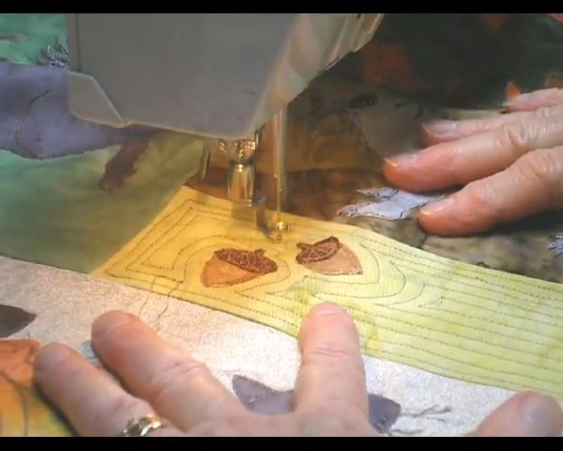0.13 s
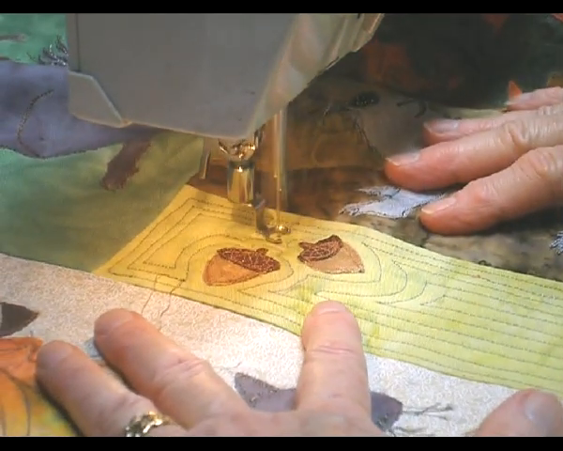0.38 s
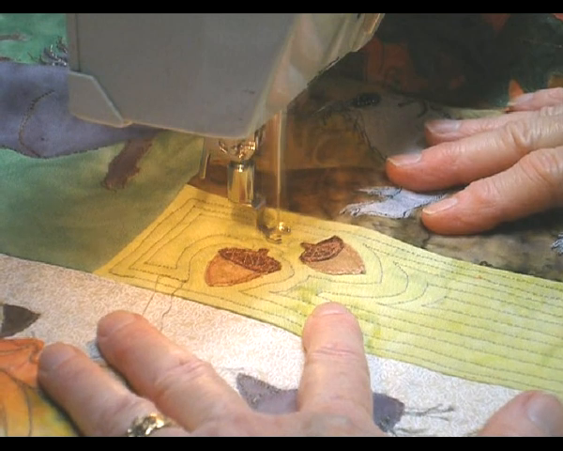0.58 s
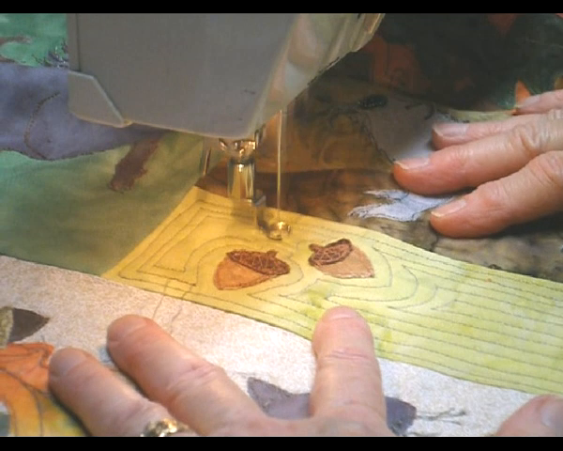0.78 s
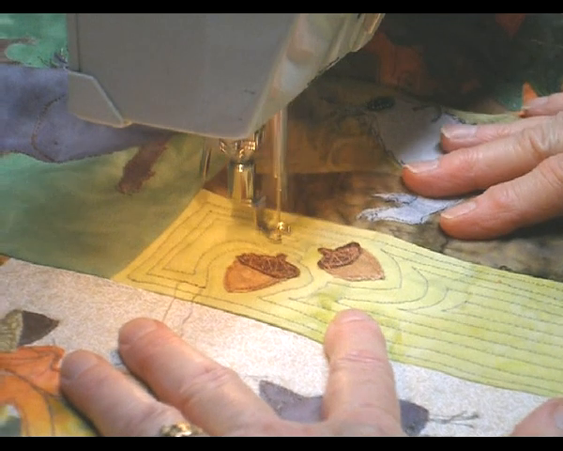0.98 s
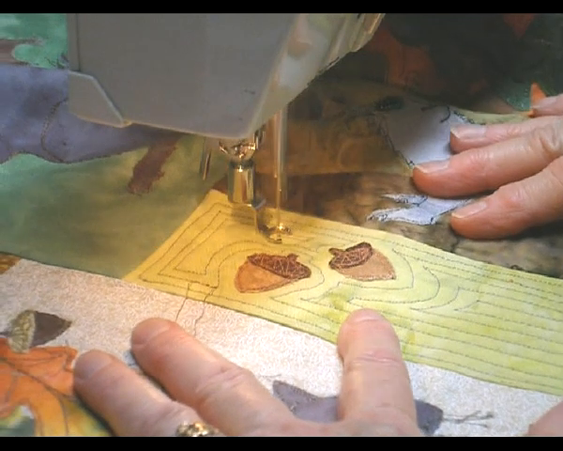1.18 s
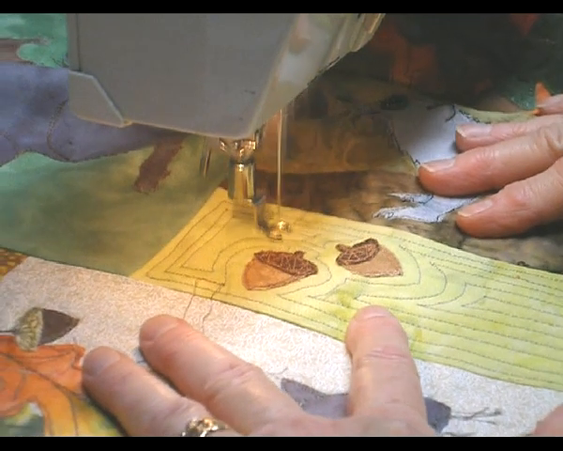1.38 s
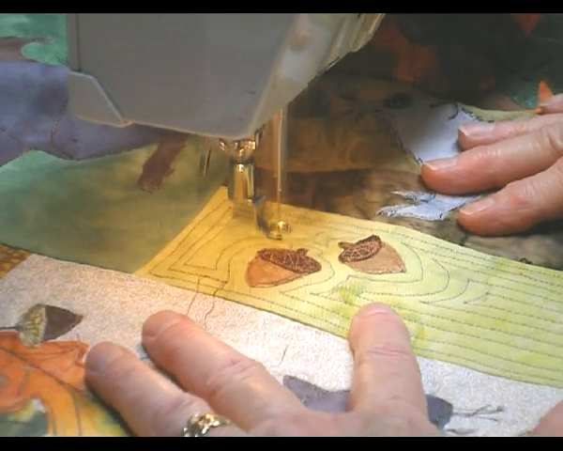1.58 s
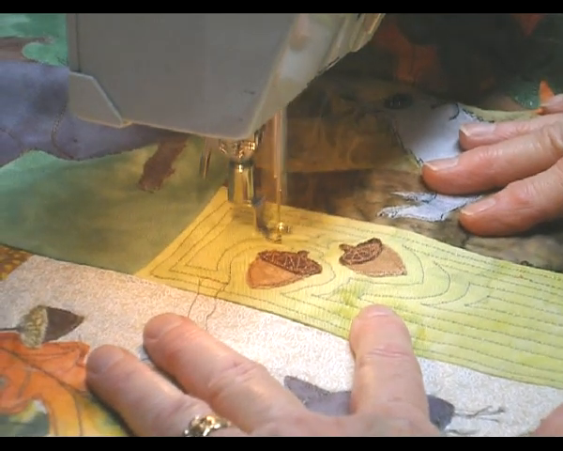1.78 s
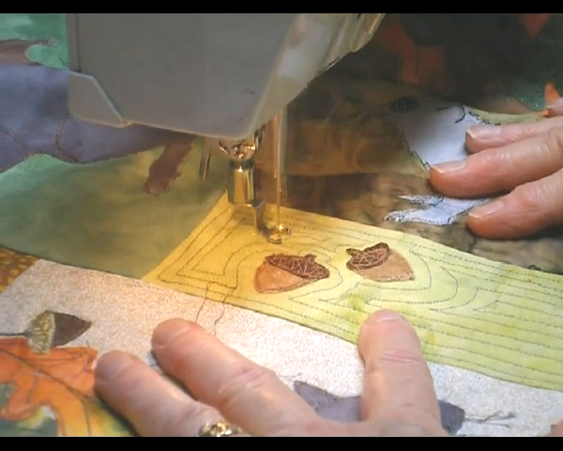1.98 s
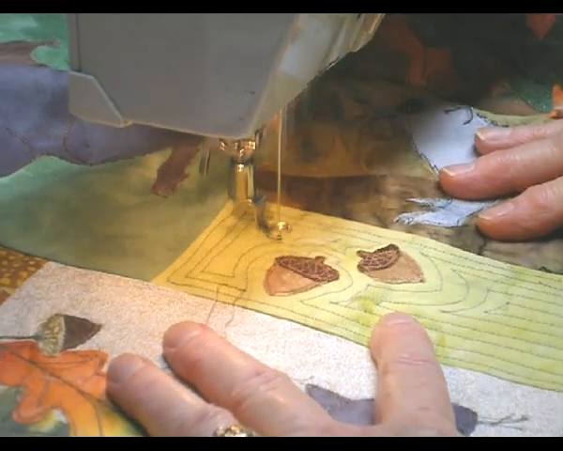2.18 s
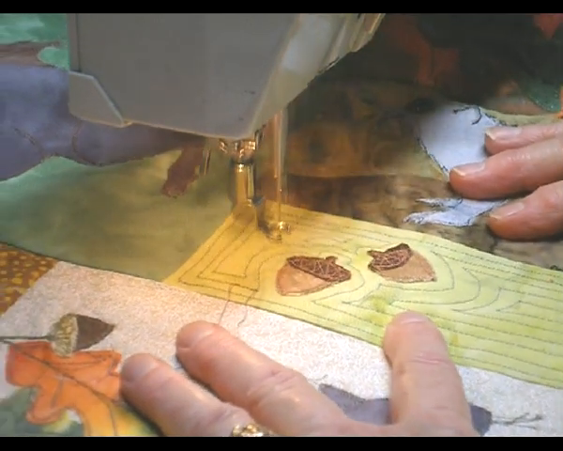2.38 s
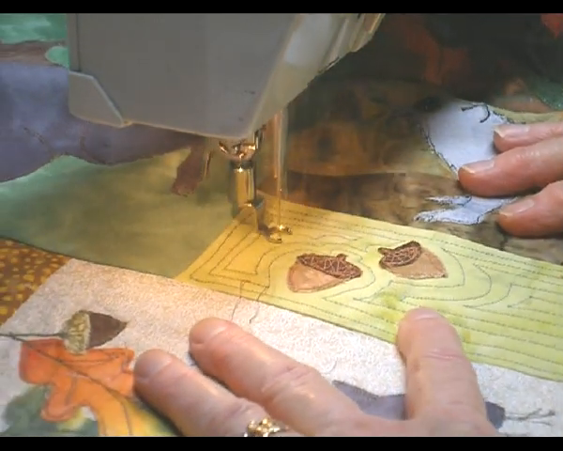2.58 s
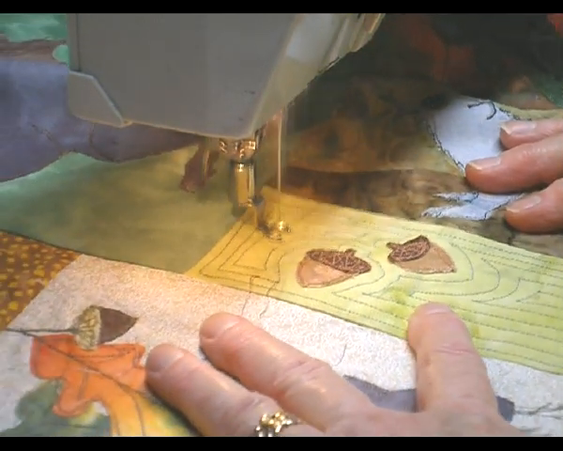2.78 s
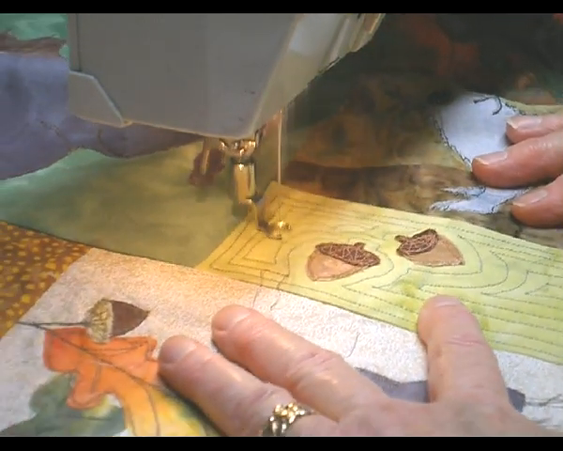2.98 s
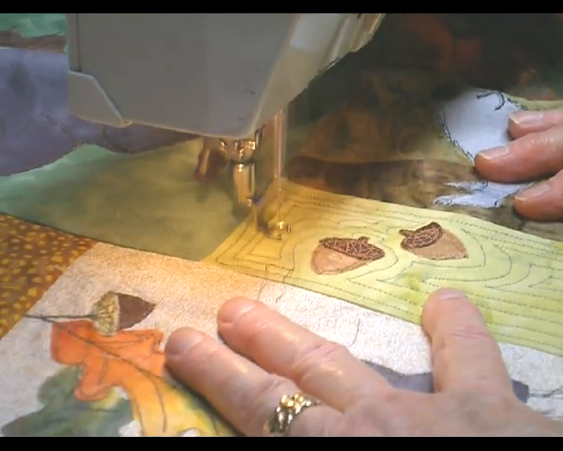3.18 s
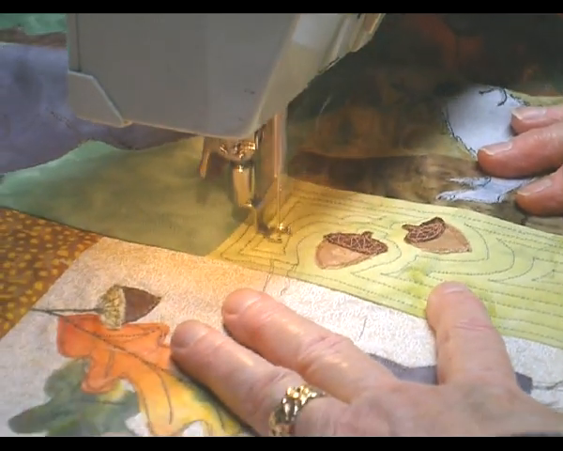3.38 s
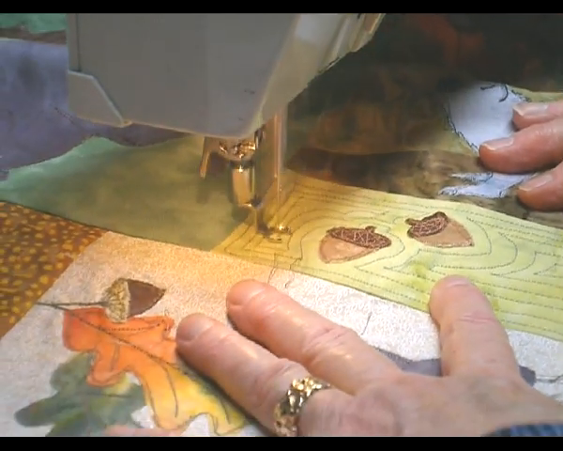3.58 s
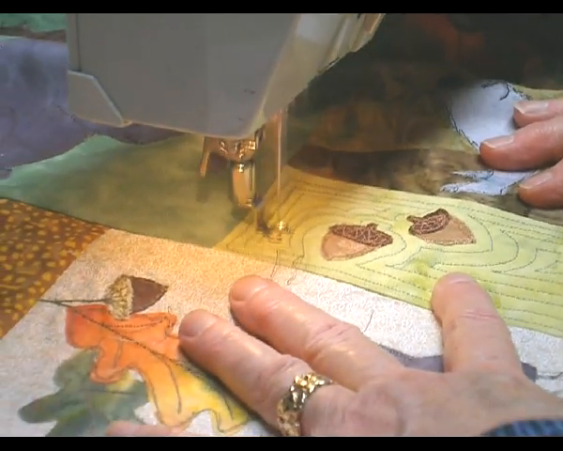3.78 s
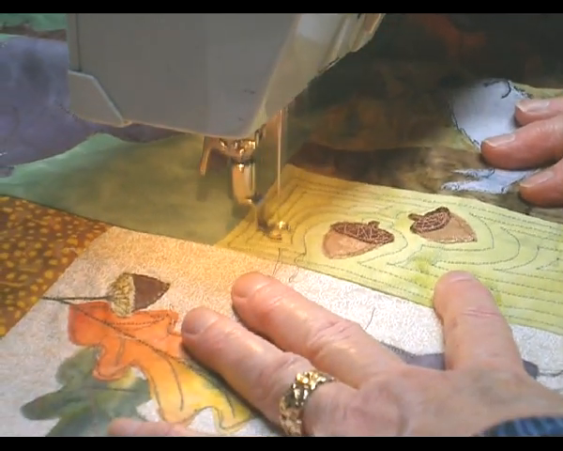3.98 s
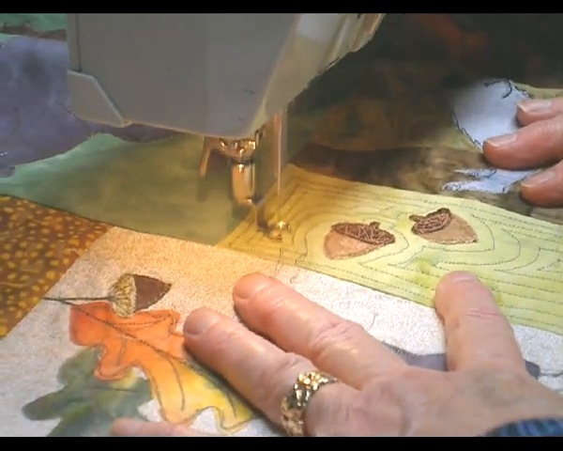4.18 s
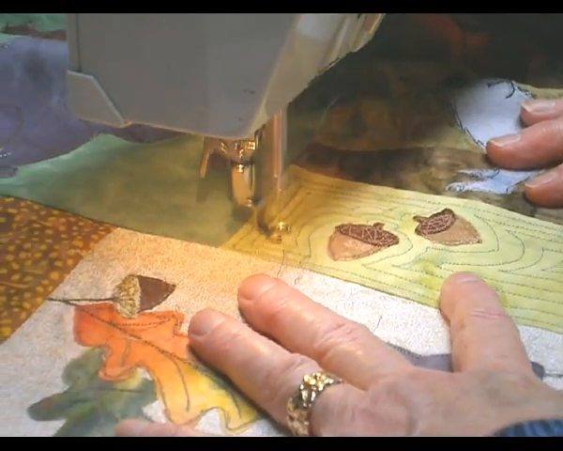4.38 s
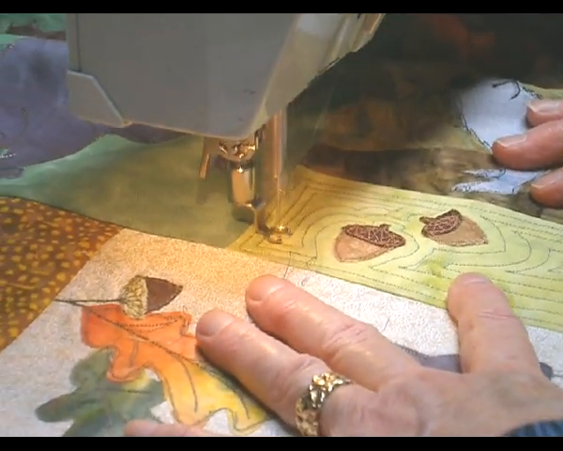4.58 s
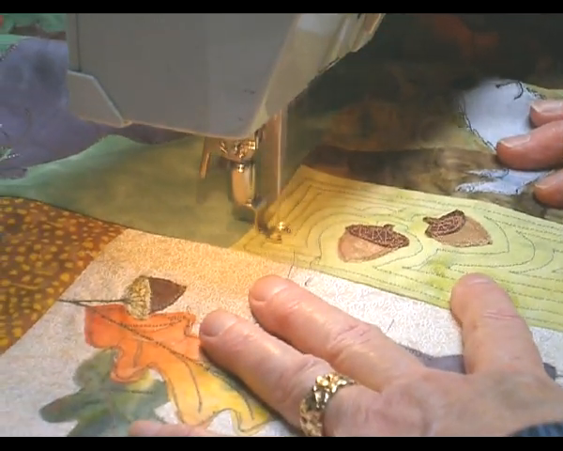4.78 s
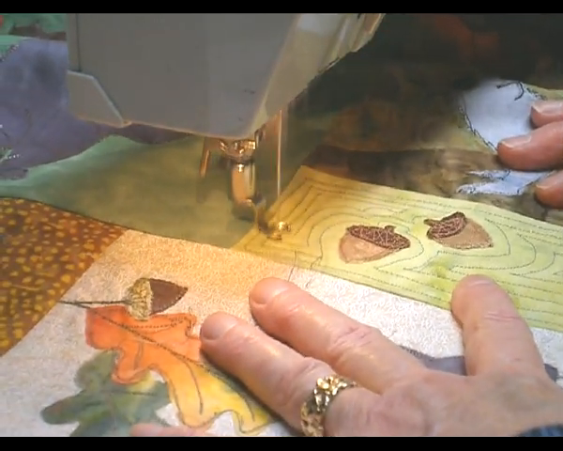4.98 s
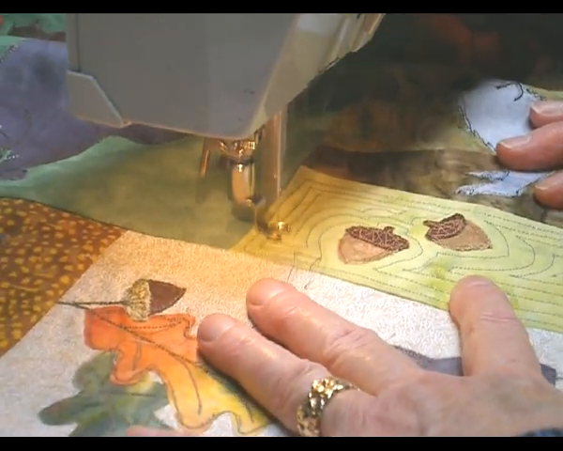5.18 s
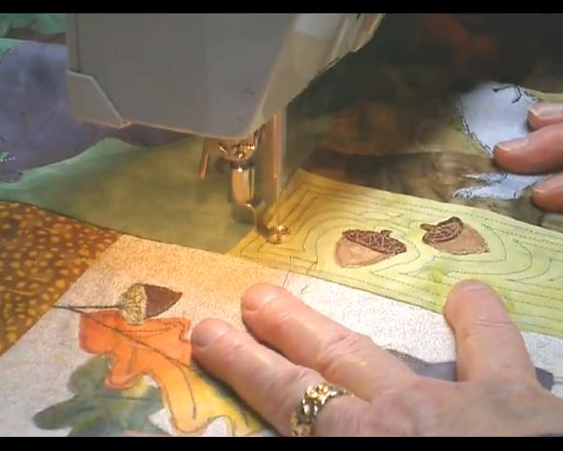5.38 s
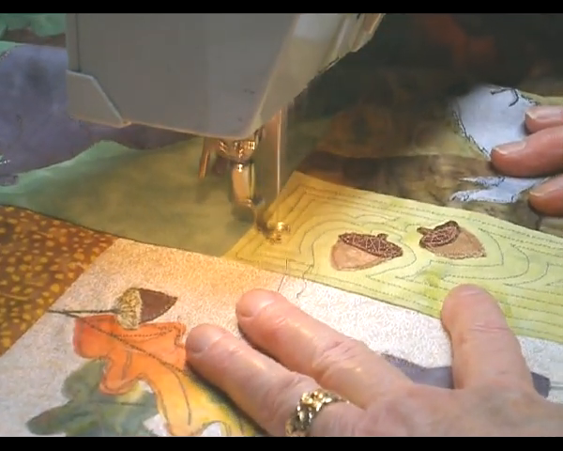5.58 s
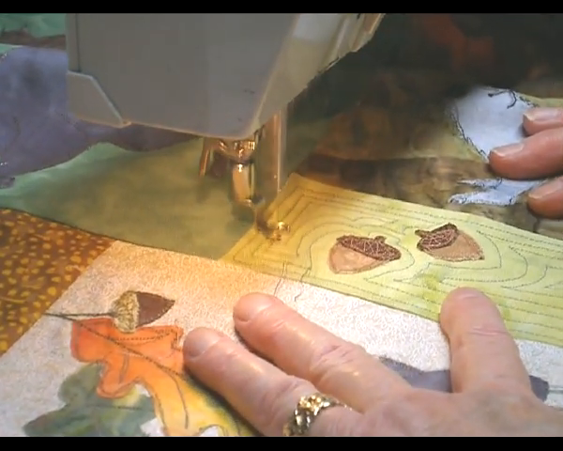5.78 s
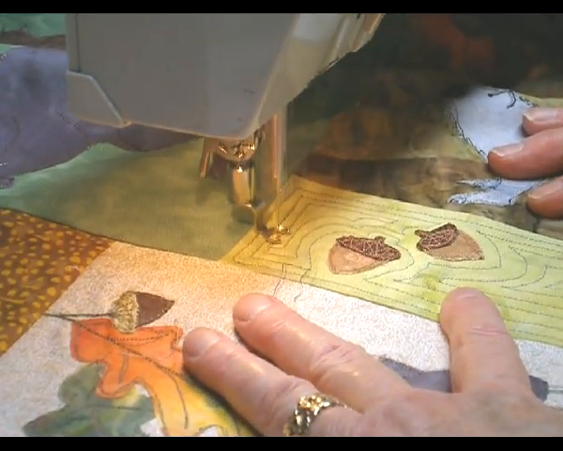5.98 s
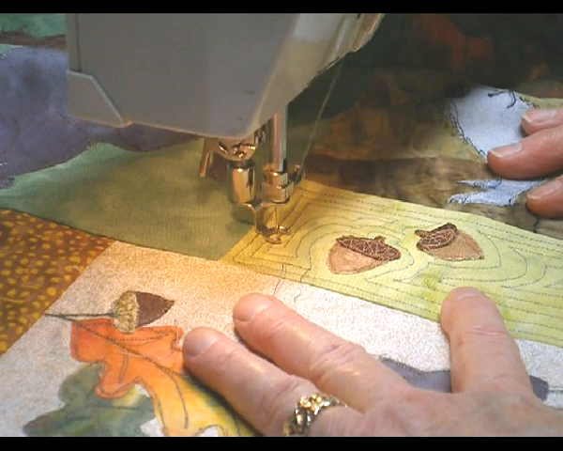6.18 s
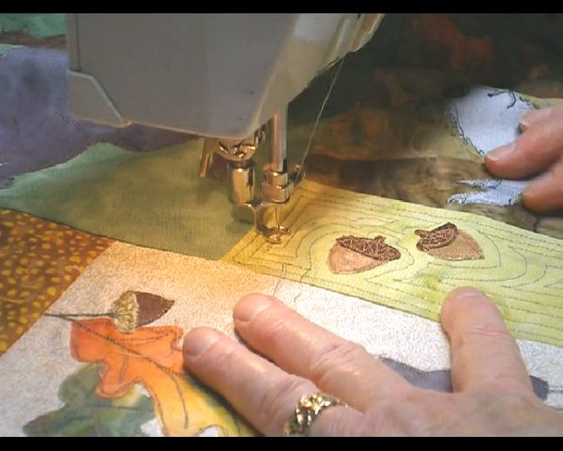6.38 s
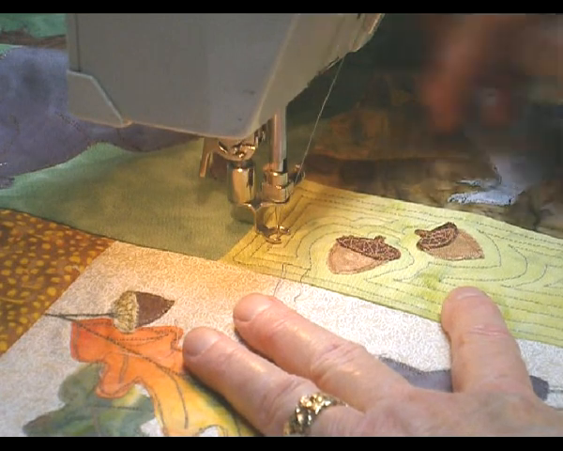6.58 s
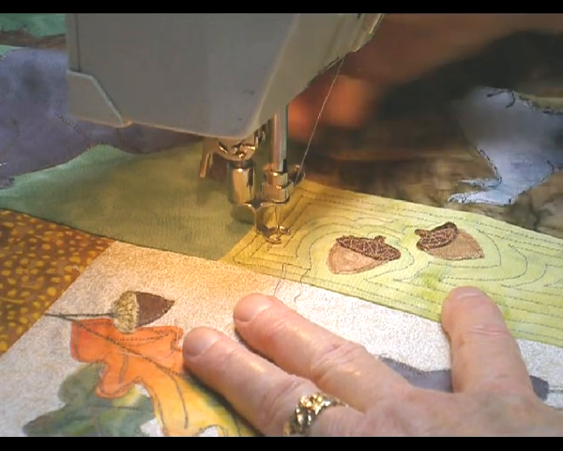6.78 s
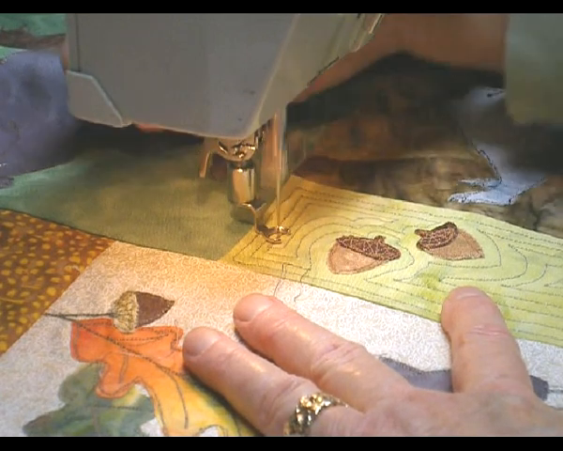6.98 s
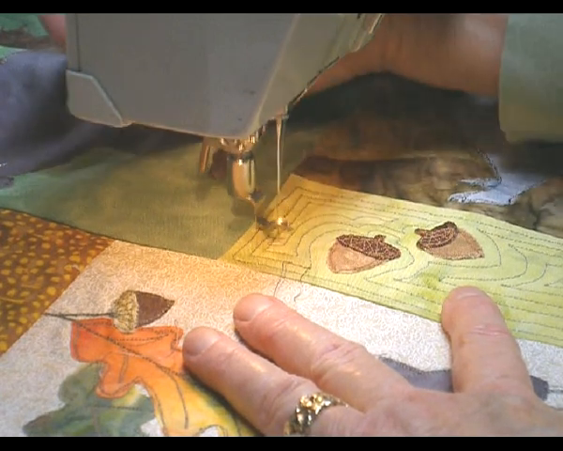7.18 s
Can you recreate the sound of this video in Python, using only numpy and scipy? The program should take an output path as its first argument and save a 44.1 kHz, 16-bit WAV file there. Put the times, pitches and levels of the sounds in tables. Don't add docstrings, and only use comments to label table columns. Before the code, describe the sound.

A home sewing machine chatters rapidly and steadily through layered cloth, stops abruptly, then a hush with a brief groan and click from the handwheel.

```python
import sys
import numpy as np
from scipy import signal
from scipy.fft import rfft, irfft, next_fast_len
from scipy.io import wavfile
from scipy.ndimage import uniform_filter1d, map_coordinates

SR = 44100
rng = np.random.default_rng(int(sys.argv[2]) if len(sys.argv) > 2 else 0)


def store_pcm(level_fs):
    pcm = np.round(np.clip(level_fs, -1, 1) * 32767).astype(np.int16)
    wavfile.write(sys.argv[1], SR, np.atleast_2d(pcm).T)


def nominal_scale(level):
    x = np.asarray(level, float) / 20
    return 10 ** x


N = 319725

# start_s, speed_turns_per_s
SHAFT_SPEED = [(0.0, 16.066), (.22, 15.822), (.312, 16.26), (.541, 16.05), (.887, 16.145), (1.008, 16.634),
               (1.643, 16.044), (2.206, 16.644), (2.589, 16.608), (2.823, 16.122), (3.225, 16.026),
               (3.752, 15.801), (3.954, 15.995), (4.216, 15.807), (4.65, 16.03), (4.799, 16.121),
               (5.005, 16.037), (5.372, 16.636), (6.335, 12)]
# time_s, level_db
DRIVE_LEVEL = [(0.0, -20), (0.4, -21.5), (2.0, -21), (2.8, -22.5), (3.6, -20.5), (4.0, -21.5), (4.4, -21),
               (5.2, -21), (5.6, -22), (6.0, -21), (6.2, -22), (6.25, -20.5), (6.292, -23), (6.32, -19.5),
               (6.345, -23.5), (6.414, -37), (6.476, -52), (6.5, -38)]
# phase_turns, level_db
SLIDE_SWELL = [(-.5, -2), (-.43, -4), (-.33, 0), (-.18, 1.5), (-.07, -0.5), (-.02, -3.5), (0.041, -3.5),
               (0.13, -6), (0.23, -1), (0.33, -1.5), (0.421, 0), (0.498, -6)]
# frequency_hz, density_db_per_hz
WHIRR_SPECTRUM = [(60, -50), (152, -31), (280, 0), (468, 0), (517, -25), (581, -4.5), (879, -7),
                  (1130, -4.5), (2190, -8), (3000, -5), (4000, -14)]
# phase_turns, level_db, centre_hz, spread_octaves
TURN_KNOCKS = [(-.46, -15, 300, .6), (-.37, 4, 600, .5), (-.3, -7, 1200, .6), (-.19, 4.5, 616, 0.22),
               (-.15, 9, 1300, 0.28), (-.11, -20, 305, 0.44), (-.03, -2, 294, 0.23), (-.01, -2, 1170, 0.42),
               (0.019, -5, 580, 0.38), (0.051, 3.5, 1400, 0.52), (0.08, -7, 597, 0.48),
               (0.222, -29, 880, 0.52), (0.291, -6, 318, 0.48), (0.377, -9, 315, 0.82),
               (0.443, -5, 617, 0.41)]
# frequency_hz, level_db, t60_s
BODY_MODES = [(251.5, -6, 0.22), (288, -11, 0.17), (363, -15, 0.054), (408.6, -5.5, 0.26), (465, -3, 0.14),
              (548.5, -11.5, 0.11), (575.1, -6, 0.34), (601, -4, 0.074), (648, -7, 0.23),
              (702.6, 3.5, 0.057), (800, -2.5, 0.088), (961, -0.5, 0.048), (1005, -12.5, 0.081),
              (1115, -11, 0.17), (1097, -10.5, 0.054), (1229, -15, 0.37), (1481, -13, 0.058),
              (1744, 0, 0.041), (1898, -4, 0.061), (2370, -2, 0.013), (2590, 2, 0.052), (2910, -4, 0.004),
              (3090, -0.5, 0.081)]
# order_per_turn, level_db
SHAFT_HARMONICS = [(7, -34), (11, -40), (16, -34), (18, -28), (26, -27), (30, -29), (36, -19), (60, -27),
                   (69, -24)]
# phase_turns, level_db, frequency_hz, t60_s
CLOTH_THUMPS = [(-.459, -7, 842, .01), (-.45, -9, 300, .02), (-.392, -6.5, 575, .05),
                (-.369, -8.4, 695, .025), (-.359, -8.5, 1099, .06), (-.31, -8.5, 2600, .012),
                (-.29, -8, 1000, .02), (-.25, -7, 1480, .02), (-.215, -8.5, 3100, .01),
                (-.193, -5, 1281, .025), (-.192, 4.3, 669, .01), (-.183, -9, 1876, .01),
                (-.145, -7, 908, .025), (-.14, -8, 340, .016), (-.103, -12, 695, .06),
                (-.075, -12, 1876, .04), (-.07, -1.5, 350, .018), (-.038, -2, 1281, .01),
                (-.02, -10, 1949, .01), (-.001, 1.5, 532, .025), (.005, -11, 1382, .04),
                (-.005, -5, 1492, .03), (.03, -6, 1477, .02), (.009, -3.5, 1187, .04),
                (.054, -4, 874, .016), (.12, -8, 440, .06), (.16, -7, 980, .04), (.188, -11.4, 1673, .016),
                (.205, 0, 597, .02), (.25, -13, 2100, .012), (.268, -5.5, 842, .01), (.277, -11, 597, .04),
                (.37, -6, 320, .03), (.404, -5.5, 842, .01), (.414, -2.2, 575, .06),
                (.415, -10, 2900, .012), (.463, -4, 669, .01)]
# delay_s, frequency_hz, level_db, t60_s
SNAP_MODES = [(0, 1800, 2, 0.0037), (0, 2600, -11, 0.002), (0, 2800, 11, 0.0032)]
SLACK_SNAPS = [.41, .84, .9, .96, 1.14, 1.45, 2.0, 2.49, 2.55, 3.16, 3.6, 3.97, 6.07, 6.39]
MISSED_SNAPS = [.53, 1.02, 1.21, 1.33, 2.79, 2.85, 2.97, 4.98, 5.65, 5.71, 5.77, 6.19, 6.25]
# frequency_hz, rms_at_stop_db, fade_db_per_s
REST_TONES = [(285.3, -54, -16), (366.1, -53, -25), (430.7, -56, -35), (565.2, -57, -35), (590, -64, -2),
              (737.5, -63, -14), (1421, -61, -28)]
# frequency_hz, density_db_per_hz
HUSH_SPECTRUM = [(60, -22), (280, -1.5), (365, -2.5), (484, -9), (581, -3.5), (1500, -13), (2700, -12),
                 (4000, -23)]
# time_s, level_db
HUSH_LEVEL = [
    (6.3, -40),
    (6.384, -29),
    (6.478, -48),
    (6.784, -46.5),
    (7.034, -51),
    (7.166, -42),
    (7.25, -42.5),
]
# time_s, groan_db, rub_db
WHEEL_LEVEL = [
    (6.95, -62, -51),
    (7.05, -27, -41.5),
    (7.138, -62, -54),
    (7.156, -42, -43),
    (7.172, -56, -53),
    (7.198, -36, -51),
    (7.226, -49, -53),
    (7.24, -44, -43),
    (7.25, -39, -50),
]
# start_s, end_s, frequency_hz, level_db
WHEEL_SQUEAKS = [
    (7.052, 7.105, 2620, -46),
    (7.095, 7.122, 2630, -44),
    (7.097, 7.12, 2000, -49),
    (7.165, 7.22, 2600, -50),
    (7.225, 7.26, 2600, -52),
]
# time_s, peak_db, frequency_hz
WHEEL_TICKS = [
    (6.755, -42, 2500),
    (6.984, -38, 2480),
    (7.017, -38, 1900),
    (7.038, -34, 2000),
    (7.151, -13.5, 3250),
    (7.188, -35, 2590),
    (7.232, -39, 1500),
]
# time_s, peak_db, frequency_hz, t60_s
WHEEL_LURCHES = [
    (6.985, -34, 734, 0.055),
    (7.0, -31, 520, 0.12),
    (7.037, -35, 520, 0.035),
    (7.043, -23, 580, 0.067),
    (7.048, -30, 400, .06),
    (7.056, -24, 468, .05),
    (7.075, -35, 380, .08),
    (7.09, -36, 620, .06),
    (7.238, -27, 433, .05),
]
# time_s, peak_db
SAMPLE_SLIPS = [(0.3396, -46), (0.509, -40), (1.09, -39), (1.8944, -39), (2.7765, -39), (3.4294, -33),
                (3.8871, -46), (4.035, -43), (4.222, -42), (4.35, -40)]
# time_s, peak_db
BROKEN_JOINS = [(1.09, -38), (1.62, -37), (1.8936, -46), (3.0494, -52), (3.2206, -44), (3.2815, -56),
                (3.746, -56), (3.802, -54), (3.8871, -48), (4.2204, -32.5), (4.69, -50), (5.4835, -49),
                (5.589, -43), (6.0761, -56)]
# time_s, peak_db
CAMERA_THUDS = [
    (2.725, -38),
    (4.223, -36),
]


def rms_one(x):
    return x / np.sqrt(np.mean(x ** 2) + 1e-20)


def in_time(rows, before=None, after=None):
    s, *columns = np.transpose(rows)
    t = np.arange(N) / SR
    return [np.interp(t, s, c, before, after) for c in columns]


def drift(rate):
    r = np.exp(-80 * np.pi * rate / SR)
    white = rng.standard_normal(N // 40 + 2002)
    slow = signal.lfilter([1], [1, -2 * r, r * r], white)[2000:]
    return np.interp(np.arange(N) / 40, np.arange(len(slow)), rms_one(slow))


def ring(clicks, hz, t60):
    r, w = nominal_scale(-60 / (t60 * SR)), 2 * np.pi * hz / SR
    return signal.lfilter([0, np.sin(w)], [1, -2 * r * np.cos(w), r * r], clicks + 1e-18)


def blow(clicks, hz, t60):
    rise_cycles = .67
    build_up_t60 = 1 / (1 / t60 + hz / rise_cycles / np.log(1000))
    return ring(clicks, hz, t60) - ring(clicks, hz, build_up_t60)


def coloured(white, spectrum):
    size = next_fast_len(N)
    hz, db = np.transpose(spectrum)
    bin_hz = np.arange(size // 2 + 1) * SR / size
    gain = nominal_scale(np.interp(np.log(bin_hz + 1), np.log(hz), db))
    return rms_one(irfft(rfft(white, size) * gain, size)[:N])


def grit(per_s, spread_db):
    sizes = nominal_scale(spread_db * np.minimum(rng.exponential(1, N), 5)) * rng.choice([-1, 1], N)
    return rms_one(sizes * (rng.random(N) < per_s / SR))


def struck(times, heights):
    at = np.round(np.asarray(times) * SR).astype(int)
    inside = (at >= 0) & (at < N)
    return np.bincount(at[inside], np.asarray(heights)[inside], N)


def shaft():
    settle_s, usual_speed = .06, 16.2
    turn_at_start = -.4954
    start, held = np.transpose(SHAFT_SPEED)
    speed = held[np.searchsorted(start, np.arange(N) / SR, "right") - 1]
    speed = uniform_filter1d(speed, size=int(settle_s * SR), mode="nearest")
    turns = turn_at_start + 1 + np.cumsum(speed) / SR
    s = np.interp(np.arange(1, 105), turns, np.arange(N) / SR)
    s = np.r_[2 * s[0] - s[1], s, 2 * s[-1] - s[-2]]
    return s, np.minimum(turns, len(s) - 1), np.clip(speed - usual_speed, -.6, .6)


def slides(turns):
    phase, db = np.transpose(SLIDE_SWELL)
    swell = nominal_scale(np.interp((turns + .5) % 1 - .5, phase, db) + 1.13 * drift(46))
    noise = coloured(grit(6000, spread_db=2.0), WHIRR_SPECTRUM)
    low = signal.sosfilt(signal.butter(2, 900, fs=SR, output="sos"), noise)
    return low * swell ** 0.32, (noise - low) * swell


def knocks(times, scatter_db=0.76, rattle_db=-28.5):
    phase, db, centre, spread = np.transpose(TURN_KNOCKS)
    count = np.arange(len(times))
    at = np.interp(count[:, None] + phase, count, times)
    at = at + rng.normal(0, .00005, at.shape)
    force = nominal_scale(rng.normal(0, scatter_db, at.shape))
    out = np.zeros(N)
    for hz, mode_db, t60 in BODY_MODES:
        octaves_off = np.log2(hz / centre)
        reach = nominal_scale(db) * np.exp(-.5 * (octaves_off / spread) ** 2) * rng.choice([-1, 1], len(phase))
        height = reach * force * nominal_scale(rng.normal(0, 1.5, at.shape))
        blows = struck(at.ravel(), height.ravel())
        rattle = nominal_scale(rattle_db) * rng.standard_normal(N)
        out += nominal_scale(mode_db) * ring(blows + rattle, hz, t60)
    return rms_one(out)


def shaking(turns):
    turns = uniform_filter1d(turns, size=4000)
    out = np.zeros(N)
    for order, db in SHAFT_HARMONICS:
        level = nominal_scale(db + 4.4 * drift(2.1))
        out += level * np.sin(2 * np.pi * (round(order) * turns + rng.random()))
    return out


def thumps(times, over_speed):
    thump_db, scatter_db, wander_db = 5.5, 1.4, 1.5
    wander_s, jitter_s, wander_turns = .00012, .00004, 12
    lag_turns = -.004
    plate_from_hz, plate_db_per_speed = 1150, -5
    count, out = np.arange(len(times)), np.zeros(N)
    pull_db = plate_db_per_speed * np.interp(times * SR, np.arange(N), over_speed)
    for phase, db, hz, t60 in CLOTH_THUMPS:
        chance = rng.standard_normal((len(times), 4))
        slow = uniform_filter1d(chance, size=wander_turns, axis=0) * np.sqrt(wander_turns)
        at = np.interp(count + phase + lag_turns, count, times)
        at = at + wander_s * slow[:, 0] + jitter_s * chance[:, 1]
        force_db = db + thump_db + wander_db * slow[:, 2] + scatter_db * chance[:, 3]
        force_db = force_db + pull_db * (hz > plate_from_hz)
        out += blow(struck(at, nominal_scale(force_db)), hz, t60)
    drone = ring(rng.standard_normal(N), 585.6, 0.095)
    return out + nominal_scale(-12.5) * rms_one(drone)


def snaps(times, over_speed):
    snap_db, scatter_db = -9, 0.5
    db_per_speed = -1.5
    slack_db, missed_db = -11.5, -33
    s = times[1:-1]
    db = snap_db + db_per_speed * over_speed[(s * SR).astype(int)] + rng.normal(0, scatter_db, len(s))
    for moments, loss_db in (SLACK_SNAPS, slack_db), (MISSED_SNAPS, missed_db):
        nearest = np.abs(s[:, None] - moments).argmin(axis=0)
        db[nearest] += loss_db
    at = s[:, None] + [-.0005, .0005, .0016] + rng.normal(0, 0.00008, (len(s), 3))
    tick_db = db[:, None] + [2.5, -1.5, -6.5]
    out = np.zeros(N)
    for delay, hz, mode_db, t60 in SNAP_MODES:
        strength = nominal_scale(tick_db + mode_db - 12.0 + rng.normal(0, 0.39, at.shape))
        out += ring(struck(at.ravel() + delay, strength.ravel()), hz, t60)
    return out


def machine():
    foot_phase, foot_width, foot_db = 0.11, 0.033, -2.5
    bright_db, bright_db_per_speed = -6.5, -1
    coast_db, dulling = -22.5, 3.5
    times, turns, over_speed = shaft()
    level_db, = in_time(DRIVE_LEVEL)
    slide_db = bright_db + bright_db_per_speed * over_speed
    slide_db = slide_db + dulling * np.minimum(level_db - coast_db, 0)
    gone = np.clip((6.56 - np.arange(N) / SR) / 0.076, 0, 1)
    low, high = slides(turns)
    held = nominal_scale(foot_db * np.exp(-.5 * ((turns % 1 - foot_phase) / foot_width) ** 2))
    body = held * (nominal_scale(-6.0) * knocks(times) + nominal_scale(-6.0) * low + shaking(turns))
    body = body + nominal_scale(slide_db + 6.5) * high
    body = body + thumps(times, over_speed)
    return nominal_scale(level_db) * gone * body + snaps(times, over_speed)


def room(x, t60=0.52):
    size = next_fast_len(N + SR)
    w = 2 * np.pi * np.arange(size // 2 + 1) / size
    lags = (rng.uniform(.021, .047, 8) * SR).astype(int)
    echo = 0
    for k, lag in enumerate(lags):
        loop = nominal_scale(-60 * lag / SR / t60 * (1 + 4 * w)) * np.exp(-1j * w * lag)
        echo = echo + (-1) ** k * loop / (1 - loop)
    return irfft(rfft(x, size) * echo, size)[:N]


def rest():
    stop_s = 6.5
    t = np.arange(N) / SR
    since_stop = np.abs(t - stop_s).clip(0, .6)
    tones = np.zeros(N)
    for hz, db, fade_db in REST_TONES:
        level = nominal_scale(db + 4.5 + fade_db * since_stop + 2.0 * drift(2.7))
        tones += level * np.sin(2 * np.pi * (hz * t + rng.random()))
    hush_db, = in_time(HUSH_LEVEL, before=-58)
    hush_level = nominal_scale(hush_db + 0.56 * drift(23))
    return tones + hush_level * coloured(grit(4500, spread_db=-2.0), HUSH_SPECTRUM)


def hand_wheel():
    groan_db, rub_db = in_time(WHEEL_LEVEL, before=-80)
    t = np.arange(N) / SR
    groan, rub = np.zeros(N), np.zeros(N)
    for hz, db, t60 in BODY_MODES:
        if 320 < hz < 900:
            groan += nominal_scale(db) * ring(grit(900, spread_db=-13.0), hz, 0.24 * t60)
    strongest = ring(grit(900, spread_db=3.5), 566, 0.054)
    groan = rms_one(groan) + nominal_scale(-5.0) * rms_one(strongest)
    for hz, db, t60 in BODY_MODES:
        if hz > 930:
            rub += nominal_scale(db) * ring(grit(2500, spread_db=1.0), hz, 0.075 * t60)
    out = nominal_scale(groan_db - 3.5) * rms_one(groan) + nominal_scale(rub_db + 0.5) * rms_one(rub)
    for start, end, hz, db in WHEEL_SQUEAKS:
        shape = np.sin(np.pi * np.clip((t - start) / (end - start), 0, 1)) ** .5
        out += nominal_scale(db) * shape * rms_one(ring(rng.standard_normal(N), hz, .05))
    for s, db, hz in WHEEL_TICKS:
        cycles = np.clip((t - s) * hz, 0, 7)
        out += nominal_scale(db) * np.sin(np.pi * cycles / 7) * np.sin(2 * np.pi * cycles)
        tap = struck([s + 0.00105], [nominal_scale(db - 19)])
        out += ring(tap, .76 * hz, .03) + ring(tap, .58 * hz, .03) + 2 * ring(tap, .9 * hz, .02)
    for s, db, hz, t60 in WHEEL_LURCHES:
        out += blow(struck([s], [nominal_scale(db)]), hz, t60)
    return out


def scene():
    near = machine() + hand_wheel()
    return (near + nominal_scale(-18.5) * room(near) + rest())[None]


def through_buffer(s):
    buffer_s, chunk_s, chunk_start_s = .021121, 1.3653, -.3133
    return (s - chunk_start_s) % chunk_s % buffer_s / buffer_s - .5


def low_pass(x):
    return signal.sosfilt(signal.butter(12, 15740, fs=SR, output="sos"), x)


def record(dry):
    camera_hz = 7875
    sample_slip, join_slip = .09, .17
    x = signal.sosfilt(signal.butter(4, 210, "high", fs=SR, output="sos"), dry[0])
    x = .6 * np.tanh(x / .6)
    x = signal.sosfilt(signal.ellip(6, .5, 50, 3330, fs=SR, output="sos"), x)
    n = np.arange(N * camera_hz // SR + 2)
    late = sample_slip * through_buffer(n / camera_hz)
    samples = map_coordinates(x, [(n - late) * SR / camera_hz], order=3, mode="mirror")
    step = nominal_scale(-44) * uniform_filter1d(np.abs(samples), size=40) + nominal_scale(-85)
    samples = samples + step * rng.standard_normal(len(n)) - .0014
    low_band = signal.butter(2, [65, 150], "band", fs=camera_hz, output="sos")
    rumble = signal.sosfilt(low_band, rng.standard_normal(len(n)))
    samples = samples + nominal_scale(-65.0) * rms_one(rumble)
    s, db = np.transpose(SAMPLE_SLIPS)
    at = ((s + 0.0012) * camera_hz).astype(int)
    kink = nominal_scale(db + 18.5) * rng.choice([-1, 1], len(s))
    samples[at] += kink
    samples[at + 1] -= .6 * kink
    t = np.arange(N) / SR
    out = np.interp(t * camera_hz - join_slip * through_buffer(t), n, samples)
    s, db = np.transpose(CAMERA_THUDS)
    out = out + ring(struck(s, nominal_scale(db)), 134, 0.057)
    s, db = np.transpose(BROKEN_JOINS)
    steps = struck(s + 0.0022, nominal_scale(db + 19.0) * rng.choice([-1, 1], len(s)))
    out = out + signal.lfilter([1], [1, -.75], steps)
    return low_pass(out[None])


dry = scene()
out = record(dry)
store_pcm(out)
```